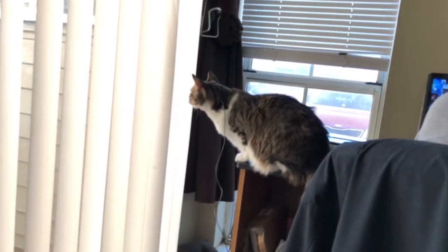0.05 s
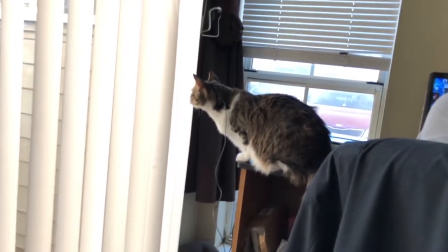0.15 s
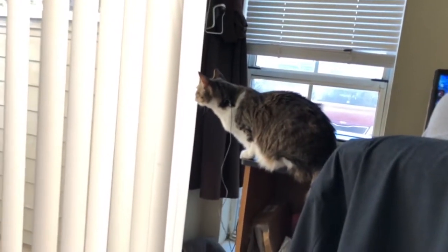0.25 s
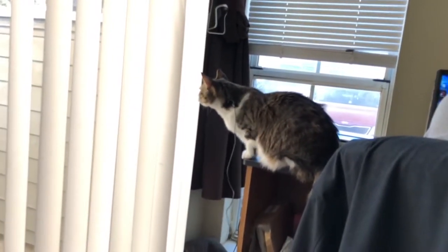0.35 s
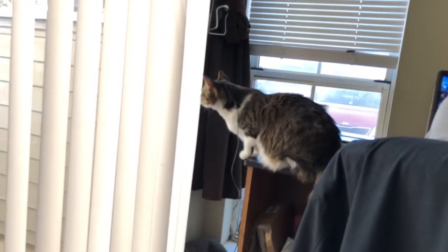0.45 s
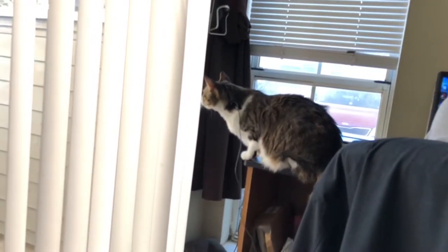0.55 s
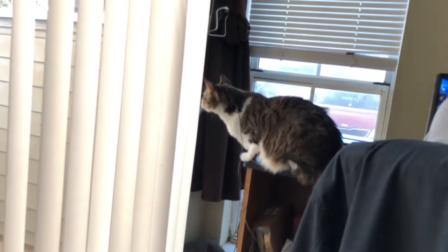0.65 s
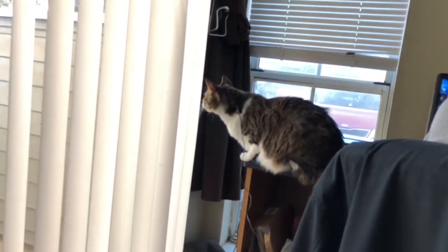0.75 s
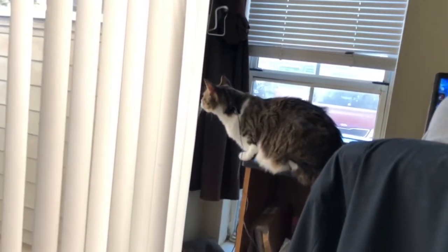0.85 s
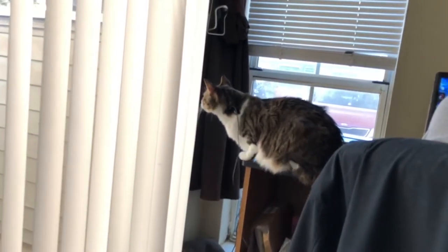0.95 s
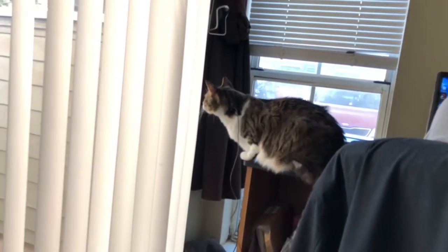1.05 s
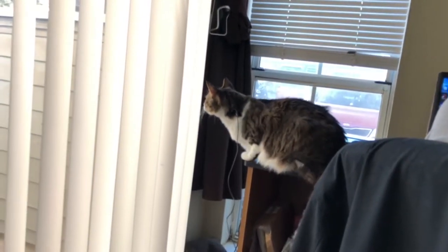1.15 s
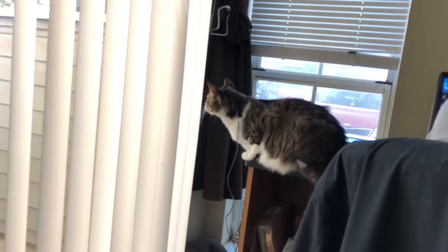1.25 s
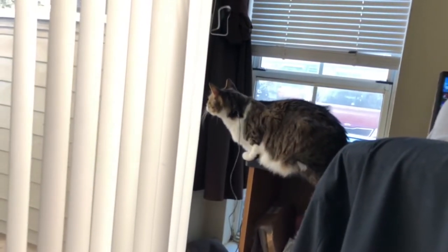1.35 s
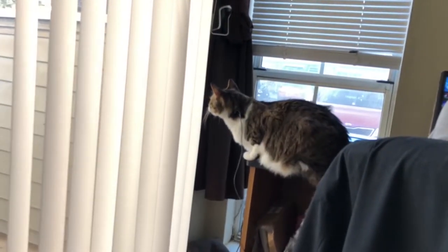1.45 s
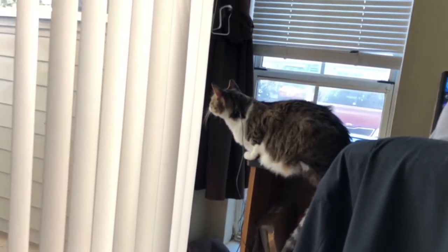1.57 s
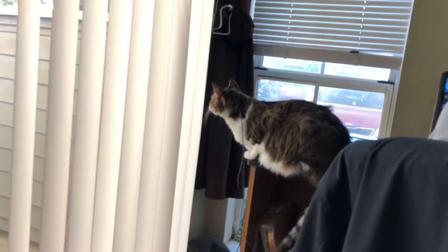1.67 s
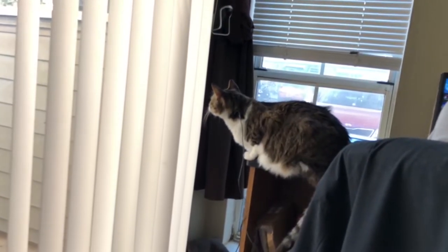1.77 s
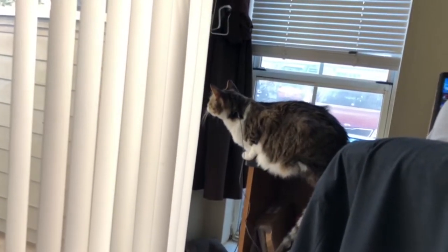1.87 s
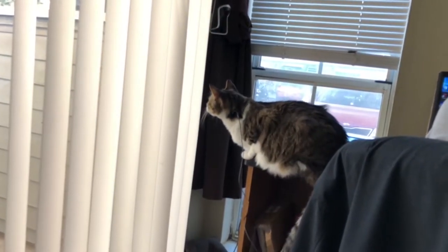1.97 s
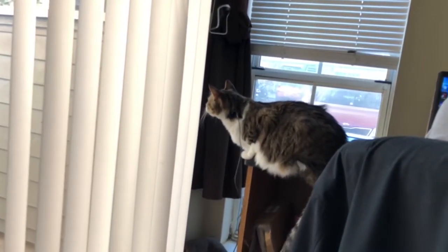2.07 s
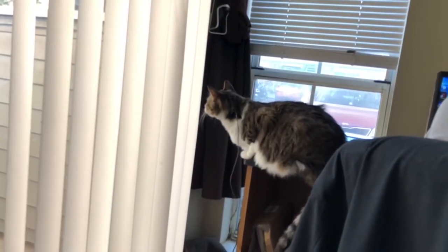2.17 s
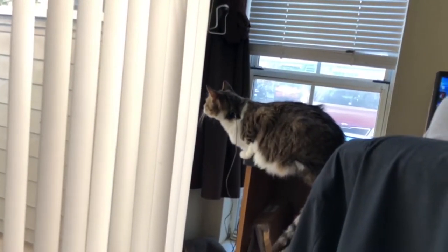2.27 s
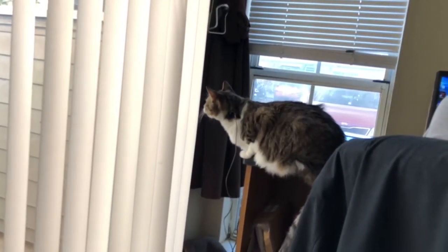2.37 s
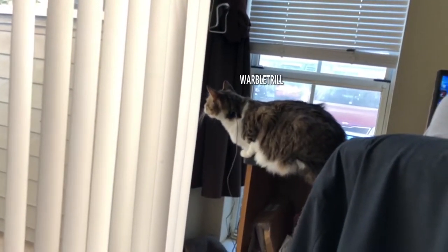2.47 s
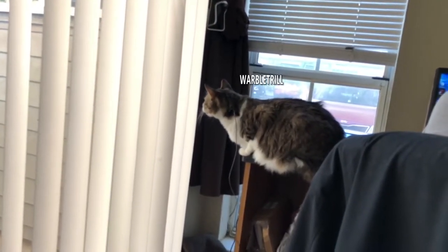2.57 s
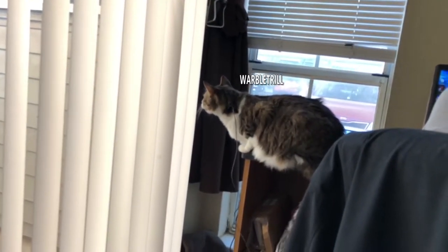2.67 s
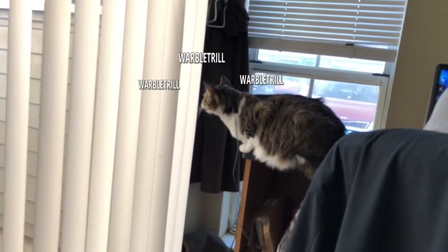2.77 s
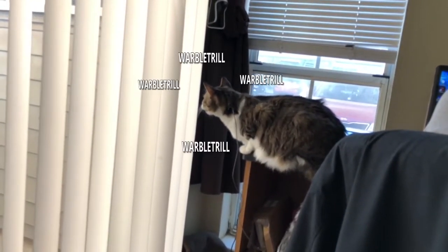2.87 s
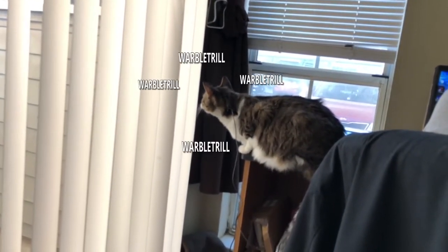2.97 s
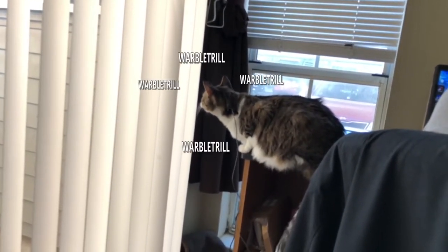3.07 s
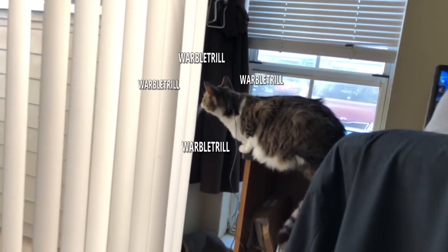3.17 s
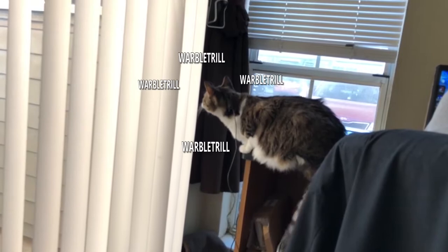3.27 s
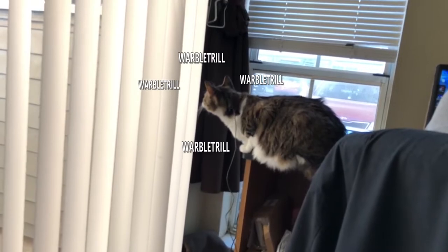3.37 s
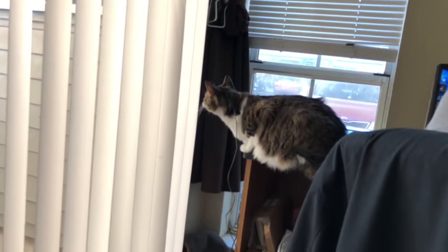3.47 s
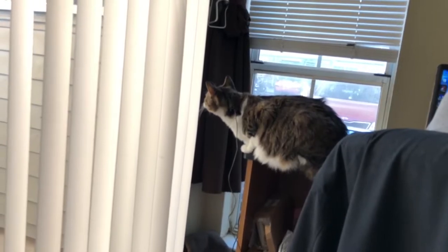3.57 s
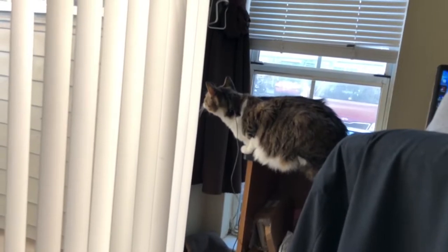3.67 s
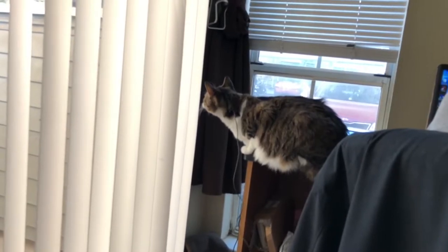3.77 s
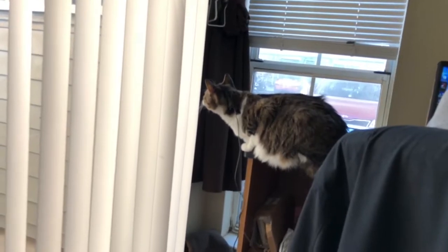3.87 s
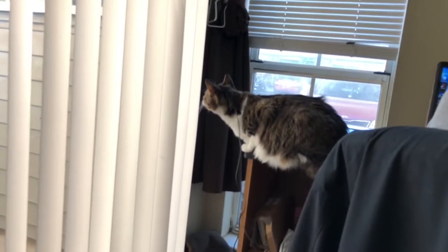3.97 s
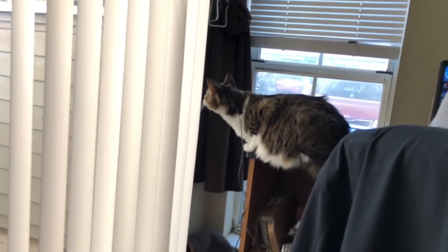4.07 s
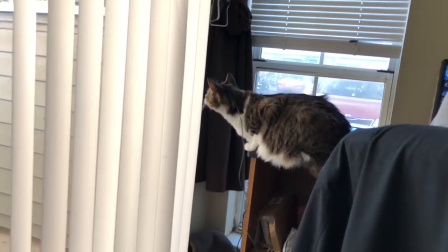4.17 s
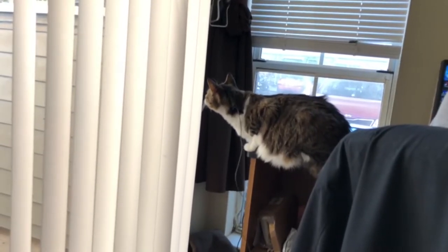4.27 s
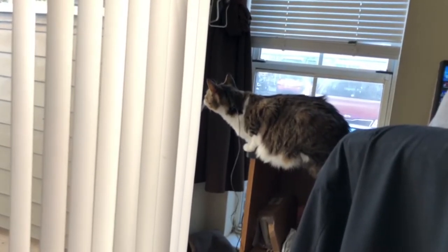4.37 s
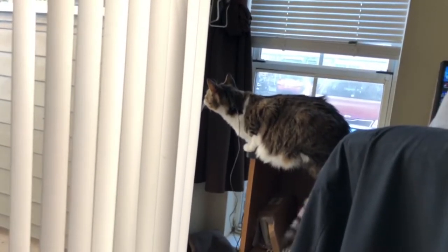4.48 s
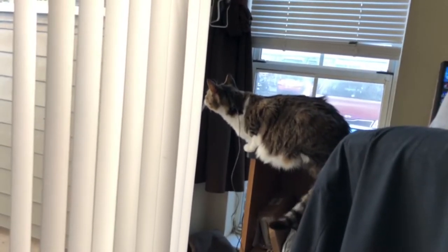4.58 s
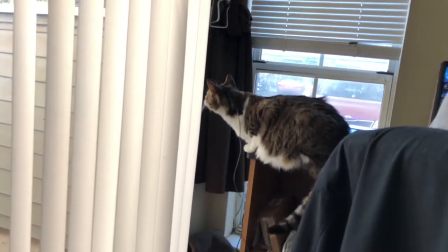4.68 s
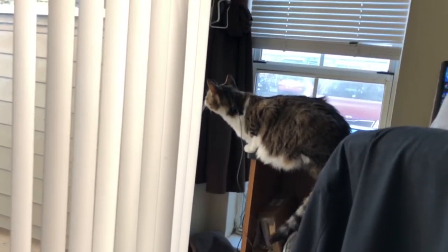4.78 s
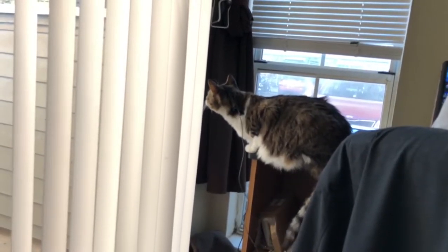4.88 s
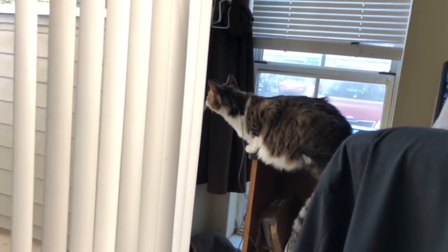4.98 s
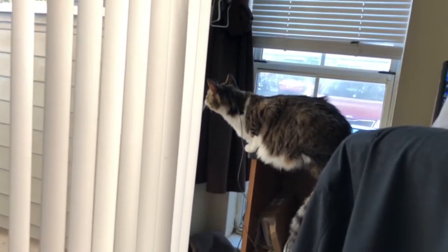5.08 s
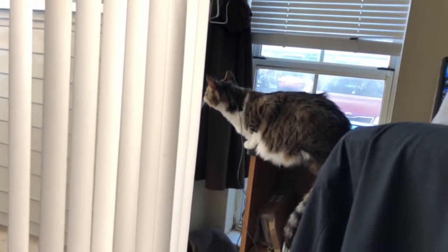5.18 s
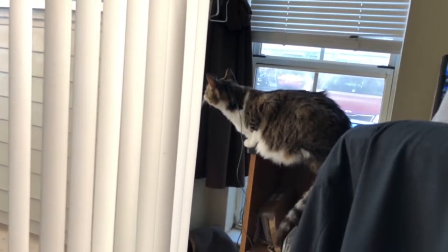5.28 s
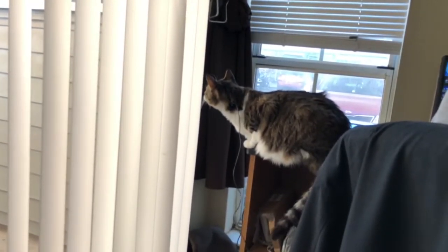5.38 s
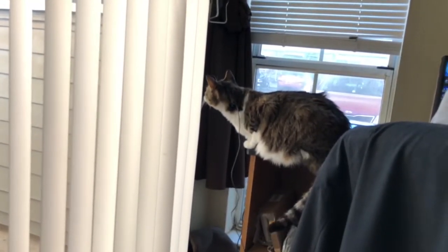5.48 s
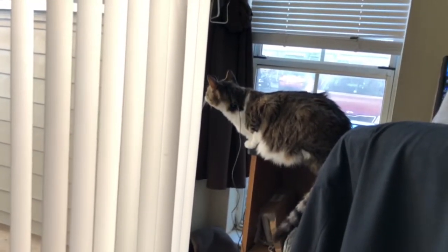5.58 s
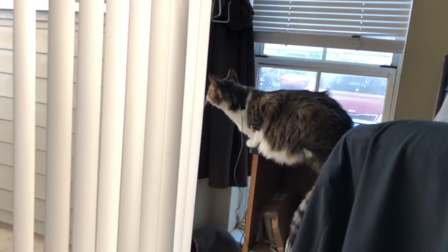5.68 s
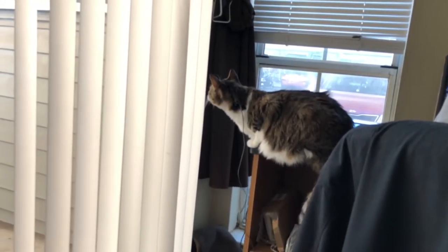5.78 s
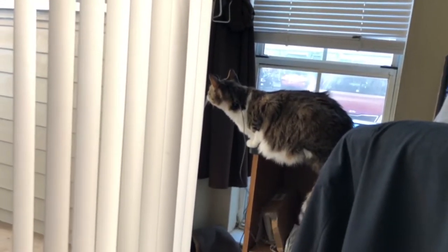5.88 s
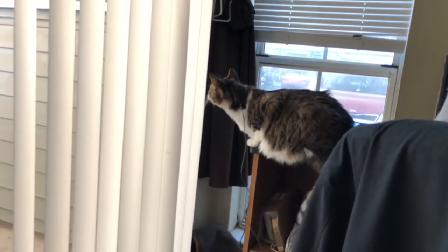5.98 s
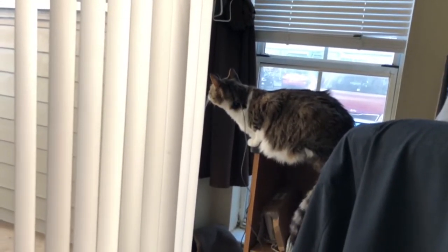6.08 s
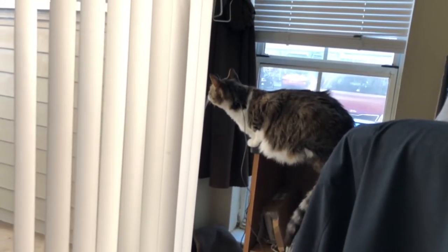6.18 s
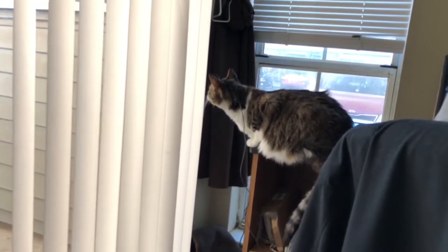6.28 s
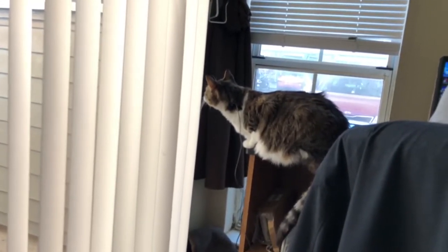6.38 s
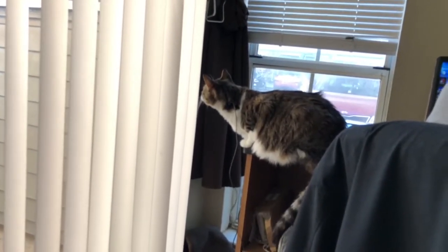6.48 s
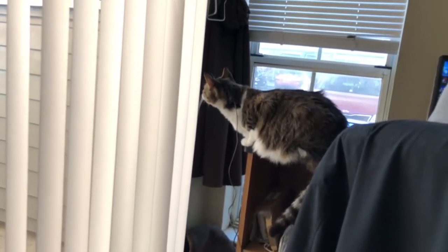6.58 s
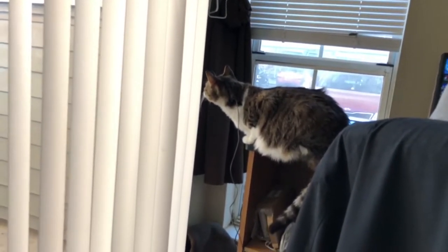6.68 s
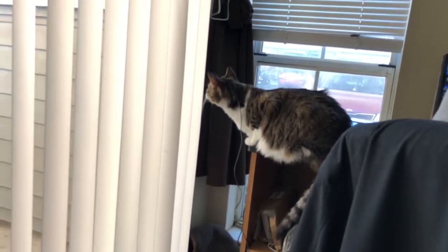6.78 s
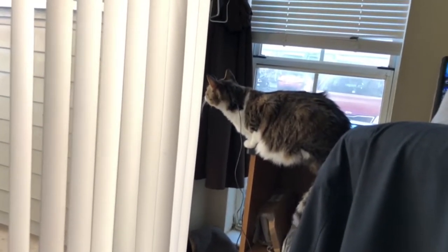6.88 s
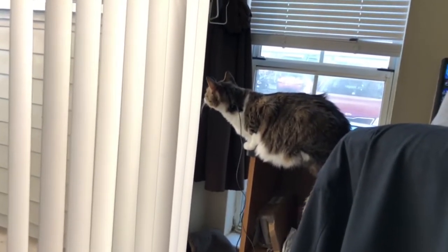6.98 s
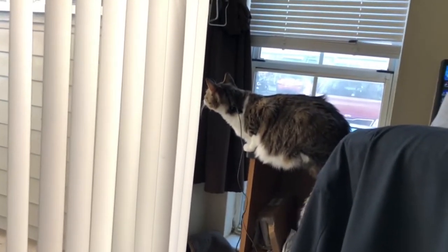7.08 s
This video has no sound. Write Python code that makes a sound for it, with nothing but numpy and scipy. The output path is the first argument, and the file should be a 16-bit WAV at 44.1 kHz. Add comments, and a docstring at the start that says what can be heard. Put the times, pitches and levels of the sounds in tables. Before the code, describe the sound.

Over the low drone of a cooling appliance indoors, a cat trills once, gurgling then clear, with soft mouth smacks later.

```python
"""A cat at a window gives one warbling trill in a small furnished room. Source and filter: pulses of
the vocal folds excite the resonances of throat, nose and nearly shut mouth. The voice starts with a
click, gurgles, clears in a quickening warble and ends in a dip, a catch and an upward flick; a breath
and later soft smacks follow. A cooling machine drones at the harmonics of its shaft over a rush of air.
Small ticks, faint rustles and a tiny stick-slip squeak sound near by, faint pips far off."""
import sys
import numpy as np
from scipy import signal
from scipy.fft import rfft, irfft
from scipy.io import wavfile

SR = 44100
rng = np.random.default_rng(int(sys.argv[2]) if len(sys.argv) > 2 else 0)


def wav_record(signal):
    """Record a signal, one row per channel, as 16-bit PCM in the file named by sys.argv[1]."""
    frames = np.transpose(np.atleast_2d(signal))
    bounded = np.clip(frames, -1, 1)
    # unit amplitude maps onto the largest positive 16-bit level
    quanta = np.round(bounded * 32767).astype(np.int16)
    wavfile.write(sys.argv[1], SR, quanta)


N = 314874


def gain_of(db):
    """Amplitude ratio of a level in decibels."""
    return 10 ** (np.asarray(db) / 20)


def unit_rms(x):
    """Normalisation to an rms of 1."""
    return x / np.sqrt(np.mean(x ** 2) + 1e-20)


def spectrum_db(points, hz):
    """Interpolation of a spectrum on a log-frequency axis."""
    f, db = np.transpose(points)
    return np.interp(np.log(hz + 1), np.log(f + 1), db)


def follow(rows, t):
    """Linear interpolation of each column of a contour at the times t."""
    times, *columns = np.transpose(rows)
    return [np.interp(t, times, column) for column in columns]


def resonance(hz, centre_hz, width_hz):
    """Lorentzian resonance curve of height 1."""
    return 1 / (1 + (2 * (hz - centre_hz) / width_hz) ** 2)


def gaussian(x, centre, width):
    """Gaussian curve of height 1."""
    return np.exp(-((x - centre) / width) ** 2)


def filtered(x, gain):
    """Zero-phase filtering by a gain that is a function of frequency."""
    return irfft(rfft(x) * gain(np.fft.rfftfreq(len(x), 1 / SR)), len(x))


def wander(size, rate_hz):
    """Slow random modulation: low-pass noise with an rms near 1."""
    return unit_rms(filtered(rng.standard_normal(N), lambda f: (f > 0) * gaussian(f, 0, rate_hz)))[:size]


def add(mix, start_s, sound):
    """Superposition of a sound on the mix from a given time."""
    part = mix[max(round(start_s * SR), 0):][:len(sound)]
    part += sound[:len(part)]


# Harmonics of the shaft, from the first up: rms level/dB
SHAFT_HARMONICS = [-29, -43.5, -58, -54.5, -58.5, -58.5, -78, -73, -76, -70.5]
# Mains hum and weaker hums beside it: f/Hz, rms level/dB
HUMS = [(120, -47), (47.5, -53), (105.5, -63), (112.8, -56.5), (131, -61), (194, -68), (223.5, -72)]

def drone(shaft_hz=29.45, drift_cycles=.02, waver=.1):
    """Periodic forcing: a compressor throbs once a turn, and steady hums beat with its harmonics."""
    t = np.arange(N) / SR
    turns = shaft_hz * t + rng.random() + drift_cycles * wander(N, 3)
    out = np.zeros(N)
    for order, db in enumerate(SHAFT_HARMONICS, 1):
        out += gain_of(db) * (1 + waver * wander(N, .85)) * np.sin(2 * np.pi * order * turns)
    for hz, db in HUMS:
        cycles = hz * t + rng.random() + 2 * drift_cycles * wander(N, 3)
        out += gain_of(db) * np.sin(2 * np.pi * cycles)
    return np.sqrt(2) * out


# Spectral density of the rush of air: f/Hz, relative level/dB
AIR_SPECTRUM = [(1, -18), (30, -14), (38, -27), (50, -22.5), (62, -16.5), (75, -26), (130, -33.5),
                (165, -36), (290, -45), (350, -49), (700, -51), (1250, -51), (1600, -57), (2700, -61),
                (3500, -68), (6000, -72.5), (10200, -76.5), (11500, -80), (16000, -82)]
# Resonances in the rush: f/Hz, width/Hz, lift/dB
AIR_RESONANCES = [(258.5, 3.8, 6), (603, 18.5, 10.5), (804, 108, 6), (1161, 29, 5.5), (2710, 37, 5.5)]

def air(midband_db=-57, early_hiss_db=2.5, settle_s=.72):
    """Broadband flow noise coloured by resonances; the hiss settles slightly at first."""
    def colour(f):
        lift_db = sum(db * resonance(f, hz, width) for hz, width, db in AIR_RESONANCES)
        return gain_of(spectrum_db(AIR_SPECTRUM, f) + lift_db)

    rush = filtered(rng.standard_normal(N), colour)
    midband = filtered(rush, lambda f: (f > 350) & (f < 3000))
    hiss = filtered(rush, lambda f: f / (f + 800))
    settling = gain_of(early_hiss_db * np.exp(-np.arange(N) / SR / settle_s))
    return gain_of(midband_db) / midband.std() * (rush + (settling - 1) * hiss)


# Spectral density of the rumble: f/Hz, relative level/dB
RUMBLE_SPECTRUM = [(1, 0), (3, 0), (9, -11), (18, -16), (27, -12), (36, -23), (50, -26), (80, -50),
                   (300, -100)]

def rumble(rms_db=-31.5):
    """Infrasound: a low rumble, likely from handling the microphone, mostly below the range of hearing."""
    noise = filtered(rng.standard_normal(N), lambda f: (f > 0) * gain_of(spectrum_db(RUMBLE_SPECTRUM, f)))
    return gain_of(rms_db) * unit_rms(noise)


# Small dry ticks: t/s, peak level/dB, tilt/(dB per octave)
TICKS = [(.157, -50, 1), (1.118, -49, 3), (1.2116, -47, 3), (1.2255, -41.5, -2), (1.830, -46, 6),
         (1.9297, -45, 13), (3.110, -49, 6), (3.2785, -28.5, -1), (4.011, -37.5, -3), (5.4295, -49, 1),
         (6.565, -48, 0)]
# Spectrum of a tick: f/Hz, relative level/dB
TICK_SPECTRUM = [(500, -30), (2000, -14), (3600, -1), (5600, -7), (7100, -1), (8500, -3), (10300, 2),
                 (12000, -7), (14000, -10), (16000, -22)]

def ticks(scatter=.11, scatter_t60_s=.004):
    """Impulsive sound: each tick is one broadband snap with an exponentially decaying scatter."""
    t, out = np.arange(2048) / SR, np.zeros(N)
    lead = len(t) // 2
    for start_s, db, tilt in TICKS:
        snap = (t == 0) + scatter * rng.standard_normal(len(t)) * gain_of(-60 * t / scatter_t60_s)
        snap = filtered(np.roll(snap, lead),
                        lambda f: gain_of(spectrum_db(TICK_SPECTRUM, f) + tilt * np.log2(f / SR + .01)))
        add(out, start_s - lead / SR, gain_of(db) * snap / abs(snap).max())
    return out


# Short soft noise bursts: t/s, duration/s, rms level/dB, centre f/Hz, width/Hz
NOISE_BURSTS = [(0.445, 0.044, -72, 5000, 6000), (1.195, 0.13, -76, 6000, 8000),
                (2.395, 0.069, -70, 6000, 7000), (2.459, 0.0036, -60, 9300, 6000),
                (2.78, 0.3, -78, 8500, 8000), (2.974, 0.076, -69, 2174, 1797),
                (4.87, 0.026, -69, 3670, 1800), (4.959, 0.023, -66, 3700, 1800),
                (5.002, 0.007, -58, 1700, 1400), (5.003, 0.03, -68, 3200, 4000)]

def noise_bursts(grain_db=3):
    """Modulated noise: faint rustles, the cat's breath after the trill, fizz and body of mouth clicks."""
    out = np.zeros(N)
    for start_s, length_s, db, centre_hz, width_hz in NOISE_BURSTS:
        progress = np.linspace(0, 1, int(length_s * SR))
        grains = rng.standard_normal(N)[:len(progress)] * gain_of(grain_db * wander(len(progress), 370))
        band = filtered(grains, lambda f: resonance(f, centre_hz, width_hz))
        add(out, start_s, gain_of(db) * unit_rms(band * np.sqrt(progress) * (1 - progress)))
    return out


# Wet clicks of the mouth: t/s, peak level/dB, lower edge f/Hz
SMACKS = [(2.4163, -42, 900), (2.4592, -32.5, 3900), (2.4645, -42, 5100), (2.963, -49, 1100),
          (4.872, -52, 2200), (4.8769, -43.5, 1400), (4.957, -48, 3000), (4.963, -46, 1900),
          (5.005, -44, 900)]
# Modes of the mouth cavity: f/Hz, relative level/dB, T60/s
CAVITY_MODES = [(2100, -18, .01), (4000, 9.5, .022), (4510, 5.5, 0.013), (5580, 7.5, 0.045),
                (7400, -1.5, 0.038), (9150, -10, 0.031)]

def smacks(ring_db=-15, snap_t60_s=.0021):
    """Free vibration: parting tongue and lips ring the mouth; a smaller pocket rings only higher modes."""
    t, out = np.arange(3000) / SR, np.zeros(N)
    snap = gain_of(-60 * t / snap_t60_s)
    for start_s, db, edge_hz in SMACKS:
        modes = sum(gain_of(mode_db) * np.sin(2 * np.pi * hz * t)
                    * (snap + gain_of(ring_db - 60 * t / t60)) for hz, mode_db, t60 in CAVITY_MODES)
        modes = signal.sosfilt(signal.butter(6, edge_hz, "high", fs=SR, output="sos"), modes)
        modes = signal.lfilter(*signal.butter(1, 2 * edge_hz, fs=SR), modes)
        add(out, start_s, gain_of(db) * modes / abs(modes).max())
    return out


TRILL_START_S, TRILL_END_S, CLEAR_NOTE_HZ = 2.422, 2.992, 580
# Fundamental before modulation, dropping at the start and climbing to a held note: t/s, f/Hz
PITCH = [(2.428, 654), (2.444, 565.5), (2.453, 582.5), (2.467, 576), (2.481, 528.3), (2.52, 516.2),
         (2.55, 521.7), (2.564, 567.3), (2.576, 530.6), (2.595, 548.4), (2.621, 576), (2.69, 568),
         (2.771, 584.3), (2.915, 574)]

def pitch(t, warble_start_s=2.54, warble_length_s=.36, depth_hz=32.3, dips_per_s=7.13, dips_per_s2=33.7):
    """Frequency modulation: ever faster, shallower dips, then one deep dip and an upward flick."""
    elapsed = np.clip(t - warble_start_s, 0, warble_length_s)
    beats = dips_per_s * elapsed + dips_per_s2 * elapsed ** 2 / 2
    dips = np.cos(np.pi * np.maximum(beats, .5)) ** 4
    warble_hz = depth_hz * np.sqrt(1 - elapsed / warble_length_s) * dips
    last_dip_hz = 71.8 * gaussian(t, centre=2.9435, width=.0147)
    flick_hz = 2100 * np.maximum(t - 2.967, 0)
    return follow(PITCH, t)[0] - warble_hz - last_dip_hz + flick_hz


# Vocal effort: t/s, level/dB
EFFORT = [(2.44, -38), (2.556, -40), (2.65, -39.5), (2.715, -37), (2.78, -37), (2.893, -35), (2.975, -36.5)]

def envelope(t, attack_s=.012, release_s=.025):
    """Amplitude envelope: a quick attack, a hold that follows the effort, a quick release."""
    gate = np.clip(np.minimum((t - TRILL_START_S) / attack_s, (TRILL_END_S - t) / release_s), 0, 1)
    return np.sin(np.pi / 2 * gate) ** 2 * gain_of(follow(EFFORT, t)[0])


# Gurgles, in which strong and weak pulses alternate: centre t/s, half duration/s, depth (0-1)
GURGLES = [(2.519, 0.019, 0.68), (2.561, 0.011, 0.93), (2.661, .026, 0.25), (2.944, 0.0062, 0.05),
           (2.97, .008, 0.15)]

def throatiness(t):
    """Irregular phonation: rasp is high at the onset, with sagging pitch and with period doubling."""
    sag_hz = np.maximum(CLEAR_NOTE_HZ - pitch(t), 0)
    gurgles = sum(depth * np.exp(-abs((t - centre) / half) ** 3) for centre, half, depth in GURGLES)
    doubling = np.clip(gurgles, 0, 1)
    onset = np.exp(-(t - TRILL_START_S) / .025)
    rasp = np.clip(.09 + .0034 * sag_hz + .2 * doubling + .7 * onset, 0, 1)
    return sag_hz, doubling, rasp


# Fixed response of throat and nose: f/Hz, gain/dB
THROAT_RESPONSE = [(60, -45), (200, -27), (330, -2.5), (500, -0.5), (830, 0), (1050, -0.5), (1170, -6),
                   (1400, -19), (1700, -20.5), (2300, -21), (2850, -28.5), (3200, -24.5), (3450, -29.5),
                   (3700, -28), (3980, -32), (4500, -53), (5200, -49), (5550, -37), (5680, -40),
                   (5800, -44), (6100, -54), (9000, -59), (16000, -75)]
# Moving resonance of the mouth: t/s, f/Hz
MOUTH_FORMANT = [(2.44, 1890), (2.455, 2060), (2.485, 2180), (2.53, 2100), (2.56, 2020), (2.585, 1970),
                 (2.607, 1700), (2.703, 1720), (2.725, 2000), (2.8, 2030), (2.933, 2130), (2.946, 2360),
                 (2.965, 2300)]
# Narrow, whistly upper resonance, likely of the nose: t/s, f/Hz, lift/dB
NASAL_FORMANT = [(2.45, 3700, 5), (2.52, 3680, 9.5), (2.59, 3800, 10.5), (2.64, 3500, 8), (2.68, 3480, 3),
                 (2.85, 3400, 7.5), (2.94, 3142, 4.5)]

def tract_db(t, f, parting_s=.011, shut_s=2.93, full_effort_db=-36.5):
    """Formant filtering by the vocal tract, duller at low effort and while the mouth parts or shuts."""
    sag_hz, doubling, _ = throatiness(t)
    closed = np.exp(-(t - TRILL_START_S) / parting_s)
    db_per_octave = .13 * (follow(EFFORT, t)[0] - full_effort_db) - 3.5 * closed
    db_per_octave -= 90 * np.maximum(t - shut_s, 0)
    tilt_db = db_per_octave * np.log2(np.maximum(f / CLEAR_NOTE_HZ, 1))
    mouth_lift_db = (1 - closed) * (13.5 - 1.5 * doubling)  # a gurgle damps the resonance
    mouth_width_hz = 280 + 1.9 * sag_hz  # a low, slack voice broadens it
    mouth_db = mouth_lift_db * resonance(f, follow(MOUTH_FORMANT, t)[0], mouth_width_hz)
    nose_hz, nose_lift_db = follow(NASAL_FORMANT, t)
    nose_db = nose_lift_db * resonance(f, nose_hz, width_hz=370)
    return spectrum_db(THROAT_RESPONSE, f) + tilt_db + mouth_db + nose_db


def flicker_db(t, f, depth_db=1.5, rate_hz=45, width_hz=380):
    """Independent random modulation of six treble bands: the overtones flicker."""
    clock = np.arange(SR) / SR + TRILL_START_S
    return depth_db * sum(np.interp(t, clock, wander(SR, rate_hz)) * gaussian(f, hz, width_hz)
                          for hz in (1700, 2300, 2900, 3450, 4000, 5700))


def minimum_phase(db):
    """Causality: each row of gains becomes a spectrum that rings only after it is excited."""
    log_gain = np.log(gain_of(np.maximum(db, -100)))
    mirrored = np.concatenate([log_gain, log_gain[:, -2:0:-1]], axis=1)
    return np.exp(np.conj(signal.hilbert(mirrored, axis=1)))[:, :db.shape[1]]


# Spectrum of turbulence in the throat: f/Hz, relative level/dB
TURBULENCE_SPECTRUM = [(200, -19), (330, 3), (600, -4), (950, -7), (1500, -27), (1950, 4), (2450, -13),
                       (2900, -10), (3700, -13), (4400, -26), (5200, -31), (5680, -16), (6100, -31),
                       (9000, -37)]

def trill(pitch_jitter=.05, slip_cycles=.03, shimmer=.36, turbulence_db=-14):
    """Source and filter: each pulse of the vocal folds rings the tract behind the nearly shut mouth."""
    t, f = np.arange(TRILL_START_S, TRILL_END_S, 1 / SR), np.fft.rfftfreq(2048, 1 / SR)
    rasp = throatiness(t)[2]
    cycles = np.cumsum(pitch(t) * (1 + pitch_jitter * rasp * wander(len(t), 120))) / SR
    pulse_number = np.arange(1, int(cycles[-1]))
    pulse_s = np.interp(pulse_number, cycles, t)
    period_s = 1 / pitch(pulse_s)
    _, doubling, pulse_rasp = throatiness(pulse_s)
    swing = doubling * (-1.) ** pulse_number  # in a gurgle: strong and late, weak and early by turns
    slip, wobble = rng.standard_normal((len(t), 2))[:len(pulse_s)].T
    unevenness = 1 + .62 * swing + shimmer * pulse_rasp * wobble
    strength = envelope(pulse_s) * unevenness * period_s * SR / np.sqrt(2)
    onset_samples = (pulse_s + period_s * (.12 * swing + slip_cycles * pulse_rasp * slip)) * SR
    spectra = minimum_phase(tract_db(pulse_s[:, None], f) + flicker_db(pulse_s[:, None], f))
    fractional_delay = np.exp(-2j * np.pi * f * (onset_samples % 1)[:, None] / SR)
    rings = irfft(spectra * fractional_delay, axis=1) * strength[:, None]
    out = np.zeros(N)
    for sample, ring in zip(np.floor(onset_samples), rings):
        add(out, sample / SR, ring)
    puffs = rng.standard_normal(len(t)) * (1 + np.cos(2 * np.pi * cycles))  # air escapes once a cycle
    turbulence = unit_rms(filtered(puffs, lambda f: gain_of(spectrum_db(TURBULENCE_SPECTRUM, f))))
    add(out, TRILL_START_S, gain_of(turbulence_db) * envelope(t) * rasp * turbulence)
    return out


def squeak(start_s=4.987, length_s=.034, rms_db=-63.5, start_hz=4330, rise_hz_per_s=7400, slip_hz=103):
    """Stick-slip friction: a thin rising tone that pulses with each slip."""
    t, out = np.arange(0, length_s, 1 / SR), np.zeros(N)
    slips = np.sin(np.pi * t / length_s) * (1 - .66 * np.cos(2 * np.pi * slip_hz * t))
    hz = start_hz + rise_hz_per_s * t + 90 * wander(len(t), 400)
    tone = np.sin(2 * np.pi * np.cumsum(hz) / SR)
    add(out, start_s, gain_of(rms_db) * unit_rms(slips * tone))
    return out


# Far pips, likely of birds outside: t/s, duration/s, rms level/dB, f/Hz
PIPS = [(5.919, 0.084, -81, 4120), (6.05, .07, -78, 3270), (6.609, .06, -77, 3410), (6.705, .05, -76, 3400)]

def pips(waver_hz=30):
    """Tone bursts with slight frequency modulation, barely heard through the glass."""
    out = np.zeros(N)
    for start_s, length_s, db, hz in PIPS:
        size = int(length_s * SR)
        cycles = np.cumsum(hz + waver_hz * wander(size, 60)) / SR
        add(out, start_s, gain_of(db) * unit_rms(np.hanning(size) * np.sin(2 * np.pi * cycles)))
    return out


def room(x, t60_s=.22, wet_db=-24, reflections_per_s=2000):
    """Reverberation: sparse reflections decay quickly among soft furnishings."""
    t = np.arange(SR // 2) / SR
    signs = rng.choice([-1., 1.], len(t))
    arrivals = (rng.random(len(t)) < reflections_per_s / SR) * (t > .004)
    tail = signs * arrivals * gain_of(-60 * t / t60_s)
    return x + gain_of(wet_db) * signal.fftconvolve(x, tail / np.linalg.norm(tail))[:N]


def scene():
    """Superposition: the cat and the near noises in the room, with pips, drone, air and rumble."""
    near = room(trill() + smacks() + ticks() + noise_bursts() + squeak())
    return (near + pips() + drone() + air() + rumble())[None]


def record(dry):
    """Band limiting: a steep low-pass that stops from 16.5 kHz, with briefly tapered ends."""
    low_pass = signal.cheby2(14, 45, 16500, fs=SR, output="sos")
    return signal.sosfiltfilt(low_pass, dry) * signal.windows.tukey(N, .0004)


dry = scene()
out = record(dry)
wav_record(out)
```